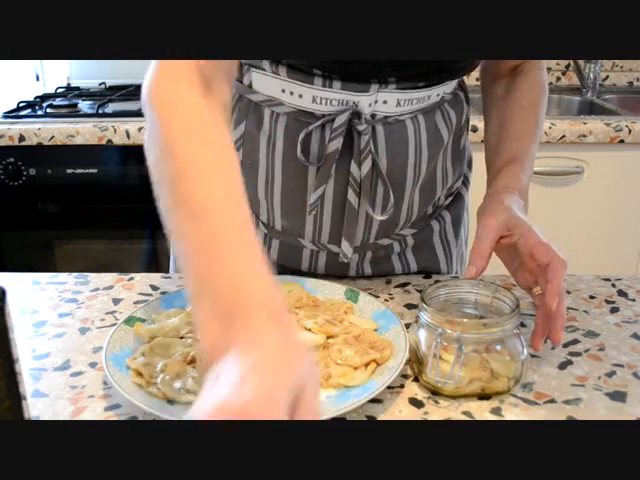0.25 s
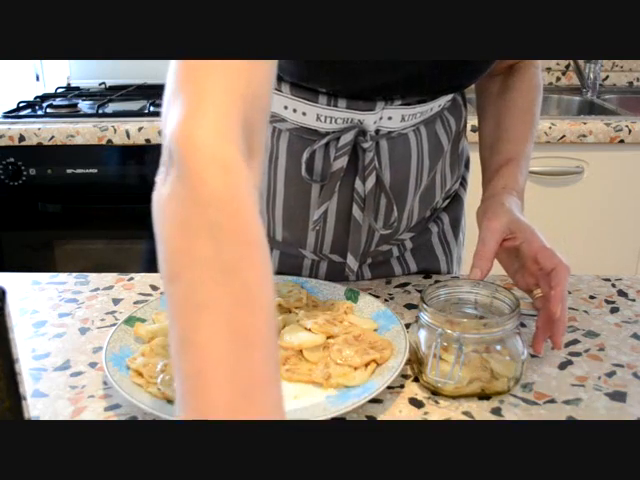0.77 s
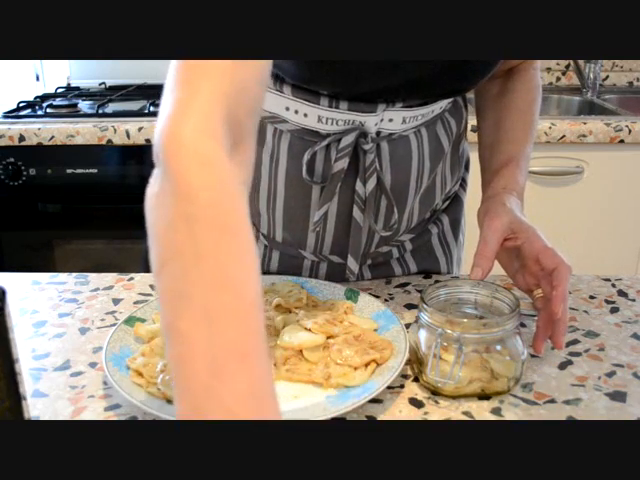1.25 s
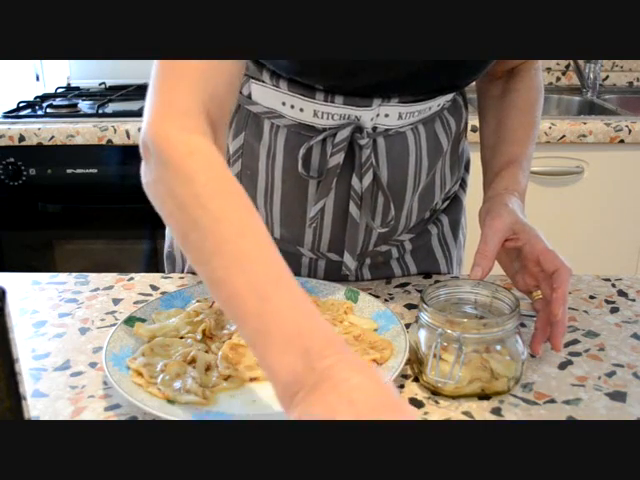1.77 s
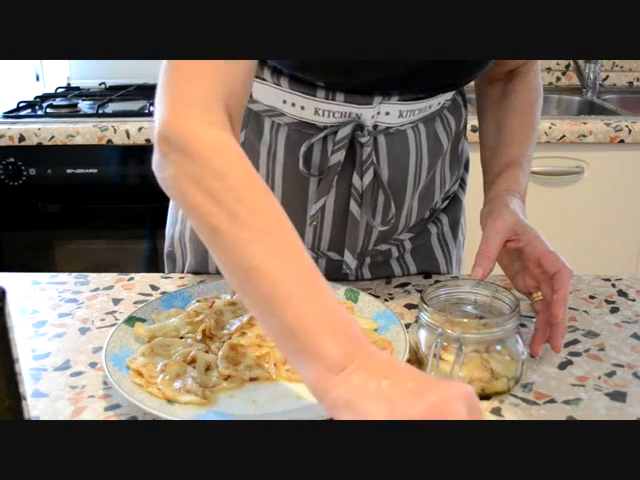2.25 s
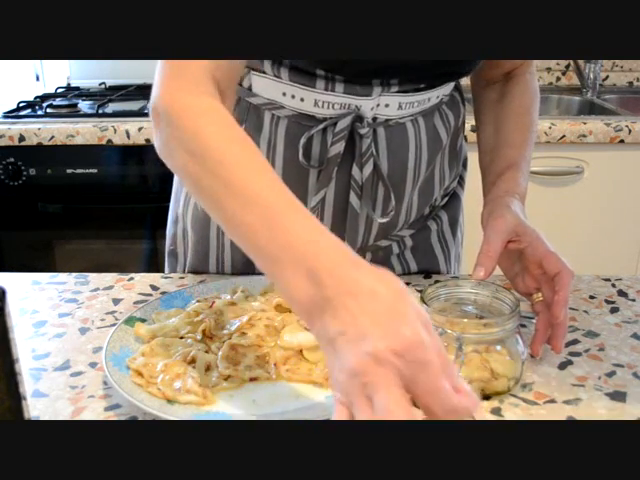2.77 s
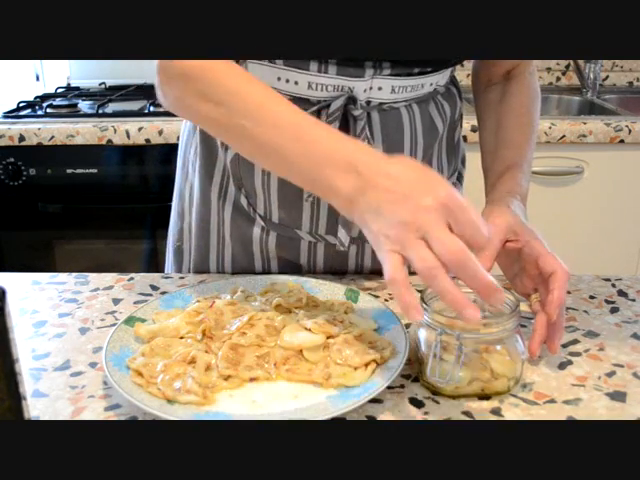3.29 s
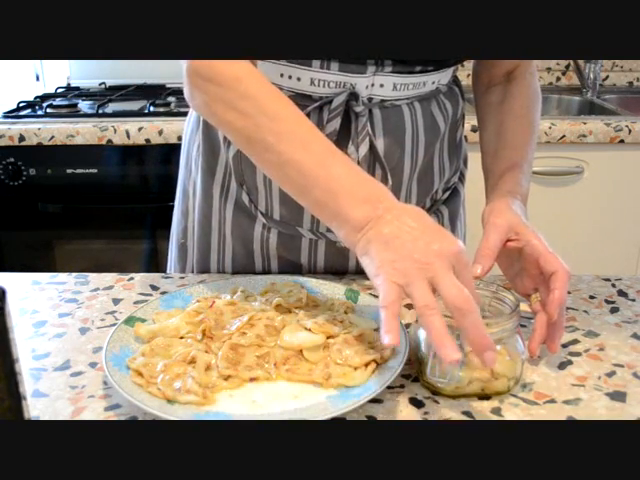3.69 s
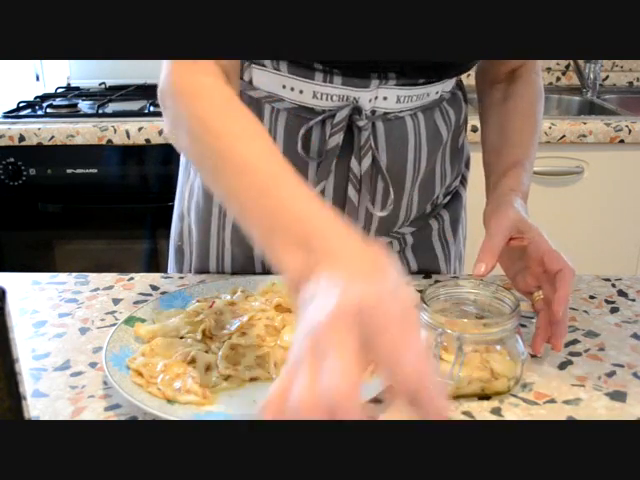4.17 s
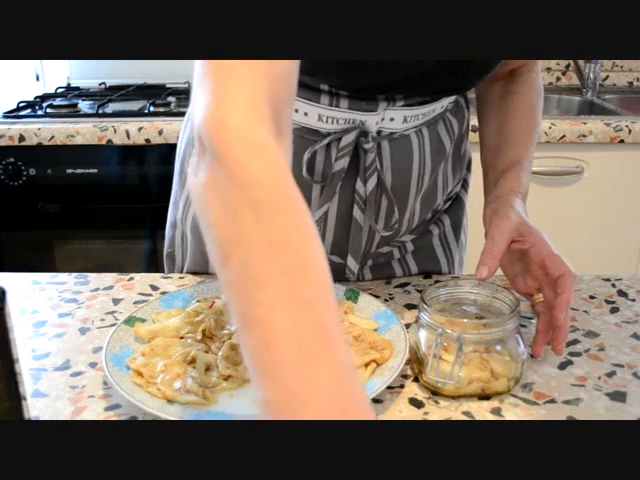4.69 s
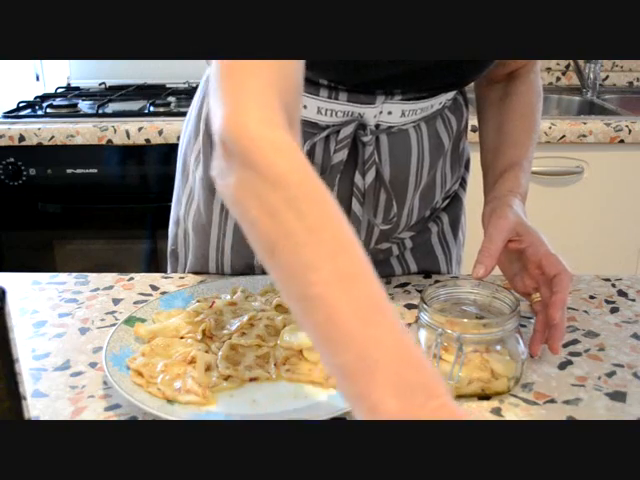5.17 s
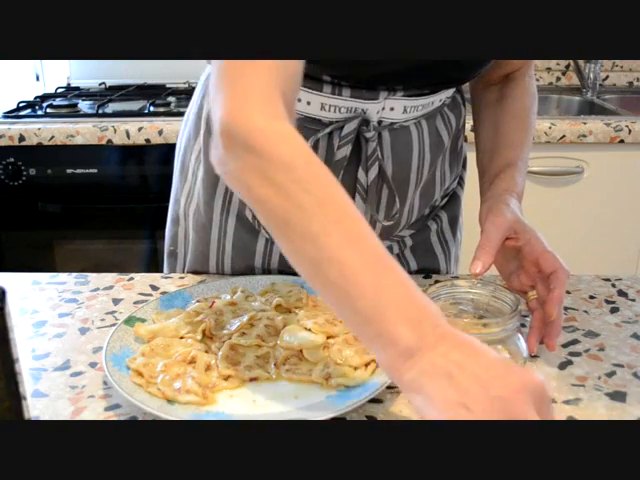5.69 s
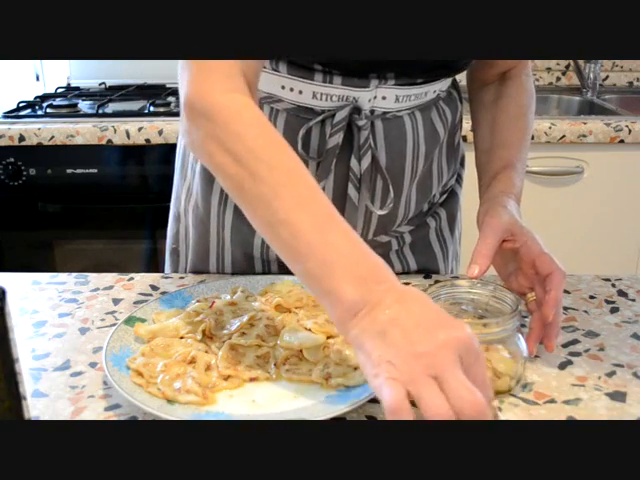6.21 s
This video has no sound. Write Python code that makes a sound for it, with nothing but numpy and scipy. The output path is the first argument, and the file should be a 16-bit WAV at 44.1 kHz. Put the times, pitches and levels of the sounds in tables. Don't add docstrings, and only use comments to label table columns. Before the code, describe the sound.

A fridge hums low and softly throughout, with a faint wavering whirr and room air. Around 0.3-0.7 s a sleeve rustles, barely audible. At 0.83 s a stoneware dish knocks the stone worktop, with a soft rocking at 0.95-1 s. From 1.4 to 1.9 s it drags over the stone in a rough, grainy grind, with hard, ringing jolts at 1.56 and 1.64 s. At 1.94 s comes the loudest event: a hard thud and bright, high clink, ringing about half a second in the hard-walled room. A small dull knock follows at 2.25 s. Faint ticks and fingertip brushes touch a glass jar at 2.7 and 3.65 s; it bumps the stone lightly at 3.99 s. More light taps come at 4.7 s, then a longer gritty drag from 4.9 to 6.15 s, swelling early and again near 5.9 s, before its echo fades.

```python
import sys
import numpy as np
from scipy import signal
from scipy.fft import rfft, irfft
from scipy.io import wavfile
from scipy.ndimage import uniform_filter1d

SR = 44100
rng = np.random.default_rng(int(sys.argv[2]) if len(sys.argv) > 2 else 0)


def volts_from_decibels(level):
    exponent = np.asarray(level, float) / 20
    return 10 ** exponent


def inscribe(sig):
    pcm = np.round(np.clip(np.atleast_2d(sig).T, -1, 1) * 32767)
    wavfile.write(sys.argv[1], SR, pcm.astype(np.int16))


N = 284004
TIME = np.arange(N) / SR
CLINK_S = 1.9364


def level(x, db):
    return x * volts_from_decibels(db) / np.sqrt(np.mean(x ** 2))


def colour(x, points):
    hz, db = np.transpose(points)
    axis = np.log(np.arange(len(x) // 2 + 1) * SR / len(x) + 1)
    gain = volts_from_decibels(np.interp(axis, np.log(hz), db))
    return irfft(rfft(x) * gain, len(x))


def band(x, hz, width_hz):
    b, a = signal.iirpeak(min(hz, .45 * SR), hz / width_hz, fs=SR)
    return signal.lfilter(b, a, x)


def walk(rate):
    hold = int(SR / rate)
    steps = np.repeat(rng.standard_normal(N // hold + 1), hold)
    slewed = uniform_filter1d(uniform_filter1d(steps, hold), hold)
    return 1.3 * slewed[:N]


def add(out, s, sound):
    i = int(s * SR)
    out[i:i + len(sound)] += sound[:N - i]


def ring(hz, db, t60):
    t = TIME[:int(t60 * SR)]
    contact = np.minimum(t / .0004, 1)
    return volts_from_decibels(db) * np.sin(2 * np.pi * hz * t) * 1000 ** (-t / t60) * contact


def drags():
    # start_s, force_db
    forces = [
        [(1.39, -41.5), (1.45, -34.5), (1.542, -36), (1.56, -28.5), (1.65, -30.5), (1.75, -35), (1.826, -36.5),
         (1.92, -38)],
        [(4.91, -39), (4.99, -35.5), (5.14, -29.5), (5.4, -30.5), (5.55, -30.5), (5.68, -34), (5.934, -29.5),
         (6.134, -36), (6.18, -56)],
    ]
    # pitch_hz, level_db (per Hz)
    grind_spectra = [
        [(88, -58), (150, -34.5), (328, -25.5), (378, -4), (532, -11), (605, -2.5), (839, -3.5), (941, -3),
         (1070, -5), (1220, -3), (4500, -29.5), (5850, -51), (9900, -120)],
        [(88, -66), (150, -36), (322, -27.5), (376, -12.5), (528, -10), (599, -5.5), (854, 5), (1130, 0),
         (1940, -8), (2110, -9.5), (4400, -28), (5720, -62), (9680, -120)],
    ]
    # pitch_hz, level_db (per Hz)
    grit_spectrum = [(1470, -18), (2500, 1.5), (4110, -9.5), (5500, -7.5), (6080, -14.5), (6560, -11.5),
                     (9570, -15.5), (11300, -36.5), (14700, -58), (22000, -120)]
    # pitch_hz, width_hz, gain_db
    patches = [(420, 150, -11), (636, 140, -9), (980, 158, -7.5), (1450, 450, -5), (1890, 92, -1)]
    # start_s, extra_grit_db
    jolts = [
        (1.38, 7.4),
        (1.562, 9.6),
        (4.89, 3.3),
        (5.86, 6.2),
    ]
    settle_s, patch_swing_db = 0.12, 6
    base_grit_db, sing_db = -15, -23

    grain_sizes = np.minimum(rng.exponential(size=N), 3)
    struck = rng.random(N) < .12
    clicks = rng.standard_normal(N) * volts_from_decibels(3.0 * grain_sizes) * struck
    uneven = volts_from_decibels(2.0 * walk(40))
    grit = level(colour(np.roll(clicks, N // 3), grit_spectrum), 0)
    sings = level(band(clicks, 5930, 50), 0)
    sings += level(band(clicks, 5750, 400), -8)
    sings += level(band(clicks, 7740, 35), -17)
    grit_db = np.full(N, float(base_grit_db))
    for s, db in jolts:
        grit_db += db * (TIME > s) * np.exp(-np.abs(TIME - s) / settle_s)

    out = np.zeros(N)
    for force, spectrum in zip(forces, grind_spectra):
        s, db = np.transpose(force)
        force_db = np.interp(TIME, s, db)
        grind = level(colour(clicks, spectrum), 0) * uneven
        grind += sum(volts_from_decibels(gain_db + patch_swing_db * walk(7)) * band(grind, hz, width_hz)
                     for hz, width_hz, gain_db in patches)
        touching = uniform_filter1d(1. * ((TIME > s[0]) & (TIME < s[-1])), size=2600)
        scrape = grind + volts_from_decibels(grit_db) * grit + volts_from_decibels(sing_db) * sings
        out += touching * volts_from_decibels(force_db - 8.0) * scrape
    return out


def dull_contacts():
    # start_s, peak_db, high_hz, length_s
    dish_knocks = [
        (0.825, -27, 2080, 0.016),
        (1.381, -35.5, 1600, 0.057),
        (1.937, -11, 2325, 0.049),
        (2.7, -52.5, 1420, 0.05),
        (4.752, -41, 1280, 0.037),
        (4.898, -39, 1210, 0.029),
        (2.245, -40.5, 3500, 0.02),
    ]
    # start_s, peak_db, low_hz, high_hz, length_s
    rocks = [
        (0.954, -42, 340, 1550, .1),
        (0.99, -44, 810, 885, 0.05),
    ]
    # low_hz, high_hz, peak_db
    slam = [
        (2000, 3560, -25.5),
        (110, 330, -48.5),
        (336, 619, -31),
        (3700, 7800, -29.5),
        (7800, 10600, -45),
    ]
    # low_hz, high_hz, peak_db
    jar = [
        (305, 670, -37.5),
        (700, 1420, -46.5),
        (1850, 2340, -45.5),
    ]
    return ([(s, db, 582, high_hz, length) for s, db, high_hz, length in dish_knocks] + rocks
            + [(CLINK_S, db, low_hz, high_hz, .04) for low_hz, high_hz, db in slam]
            + [(3.9915, db, low_hz, high_hz, .01) for low_hz, high_hz, db in jar])


def knocks():
    # pitch_hz, width_hz, gain_db
    slab_modes = [(846.6, 90, -5), (1548, 160, -5)]
    out, t = np.zeros(N), TIME[:SR // 4]
    for s, db, low_hz, high_hz, length in dull_contacts():
        push = (1 - np.exp(-t / .001)) * np.exp(-t / length)
        spectrum = rfft(rng.standard_normal(len(t)) * push)
        spectrum /= np.sqrt(uniform_filter1d(np.abs(spectrum) ** 2, size=40))
        shaken = signal.butter(4, [low_hz, high_hz], "band", fs=SR, output="sos")
        scuff = signal.sosfilt(shaken, irfft(spectrum)[:SR // 5])
        scuff += sum(volts_from_decibels(gain_db) * band(scuff, hz, width_hz) for hz, width_hz, gain_db in slab_modes)
        add(out, s, volts_from_decibels(db) * scuff / np.abs(scuff).max())
    return out


def resting_rings():
    # start_s, lower_mode_db, upper_mode_db
    blows = [
        (.825, -56, -72),
        (.865, -58, -65),
        (.99, -61.5, -64),
        (1.33, -59.5, -80.5),
        (1.5648, -21.5, -25),
        (1.6413, -47, -55.5),
        (1.666, -45.5, -46.5),
        (3.085, -89.5, -66),
    ]
    # pitch_hz, t60_s
    modes = [(5920, .085), (7555, .06)]
    out = np.zeros(N)
    for s, *mode_dbs in blows:
        for db, (hz, t60) in zip(mode_dbs, modes):
            add(out, s, ring(hz, db, t60))
    return out


def clink(brief):
    pitches = [5136, 5563, 5572, 5610, 5847, 6315, 7244, 7256, 7200, 9100, 11180, 11340]
    decays = [.2, 0.61, 0.544, .025, .36, .2, .42, 0.3, .03, .02, .04, .12]
    strengths = [-41.5, -25, -28, -11, -28, -55.5, -26.5, -22, -12, -42, -58.5, -61]
    out = np.zeros(N)
    for hz, db, t60 in zip(pitches, strengths, decays):
        if (t60 < .035) == brief:
            add(out, CLINK_S, ring(hz, db, t60))
    return out


def ticks():
    # start_s, peak_db, pitch_hz
    sharp = [
        (1.3304, -51, 5500),
        (1.5633, -27.5, 6120),
        (1.6433, -19.5, 4990),
        (1.9365, -8.5, 4200),
    ]
    # start_s, peak_db, pitch_hz
    pings = [
        (2.7096, -58, 7000),
        (3.645, -57, 5840),
        (3.992, -50, 5800),
        (4.6962, -52, 5130),
        (4.6965, -45, 2710),
    ]
    # start_s, peak_db
    grazes = [
        (1.6449, -34.5),
        (1.9368, -31),
        (2.71, -54.5),
        (3.105, -55.5),
        (3.6244, -52),
        (3.97, -54.5),
        (3.9936, -52.5),
        (4.6978, -64),
        (4.782, -62),
    ]
    contacts = [(s, db, hz, hz / 1.73) for s, db, hz in sharp]
    contacts += [(s, db, hz, 270) for s, db, hz in pings]
    contacts += [(s, db, 9400, 2800) for s, db in grazes]
    out, impulse = np.zeros(N), 1. * (np.arange(SR // 20) == 0)
    for s, db, hz, width_hz in contacts:
        click = band(band(impulse, hz, width_hz), hz, 2 * width_hz)
        add(out, s, volts_from_decibels(db) * click / np.abs(click).max())
    return out


def brushes():
    # start_s, length_s, level_db
    fingertips = [
        (2.75, .08, -77),
        (3.656, .1, -73),
        (4.447, 0.076, -79),
        (4.836, .15, -77),
    ]
    # start_s, length_s, level_db, pitch_hz
    sleeve = [
        (0.463, 0.42, -68.5, 1220),
        (0.488, 0.25, -74, 2170),
    ]
    out = np.zeros(N)
    for s, length, db, hz in sleeve + [(*row, 9350) for row in fingertips]:
        hiss = level(band(band(rng.standard_normal(N), hz, hz / 6), hz, hz / 4), db)
        out += hiss * np.exp(-((TIME - s) / length * 2) ** 2)
    return out


def thumps():
    # start_s, peak_db
    pushes = [
        (1.563, -57),
        (1.643, -60),
        (1.937, -58),
    ]
    length_s = .006
    out = np.zeros(N)
    for s, db in pushes:
        add(out, s, volts_from_decibels(db) * np.hanning(int(length_s * SR)))
    return out


def kitchen(x):
    # pitch_hz, t60_s
    decay = np.array([(150, 1), (380, 1), (900, 1.0), (1800, 0.73), (3500, 0.58), (6000, 0.53),
                      (11000, 0.53)])
    tail_db, rise_s = 2.5, 0.0065
    hz, t, cells = signal.stft(rng.standard_normal(int(1.3 * SR)), SR, nperseg=256)
    t60 = np.interp(np.log(hz + 1), np.log(decay[:, 0]), decay[:, 1])
    tail = signal.istft(cells * 1000 ** (-t / t60[:, None]), SR)[1]
    tail = tail * (1 - np.exp(-TIME[:len(tail)] / rise_s))
    tail = tail * volts_from_decibels(tail_db) / np.sqrt(np.sum(tail ** 2))
    return x + signal.fftconvolve(x, tail)[:N]


def fridge():
    # pitch_hz, level_db (per Hz)
    air = [(15, -55.5), (25, -36), (90, -27), (146, -14), (386, -14), (485, -10), (552, -11), (694, -11),
           (1700, -15), (2690, -17.5), (3220, -19), (5230, -24), (7880, -30.5), (9420, -31), (11300, -48),
           (14700, -90), (22000, -120)]
    # order (multiple of shaft pitch), level_db
    hum = [(2, -77), (4, -82), (6, -86), (7, -85), (8, -81), (9, -72), (10, -64), (11, -78), (16, -86),
           (19, -84)]
    # pitch_hz, width_hz, level_db
    whirr = [(1970, 160, -74), (2635, 130, -67.5), (2958, 270, -69.5), (5140, 250, -79)]
    shaft_hz, hum_trim_db, hum_waver_db = 48.8, 0.5, 0.9

    out = level(colour(rng.standard_normal(N), air), -62.5) * volts_from_decibels(0.62 * walk(1.3))
    turn = 2 * np.pi * np.cumsum(shaft_hz * (1 + 0.000716 * walk(0.98))) / SR
    for order, db in hum:
        swing = np.sqrt(2) * volts_from_decibels(db + hum_trim_db + hum_waver_db * walk(1.9))
        out += swing * np.sin(order * turn + 2 * np.pi * rng.random())
    out += level(band(rng.standard_normal(N), 62, 40), -87.0)
    for hz, width_hz, db in whirr:
        out += level(band(rng.standard_normal(N), hz, width_hz), db) * volts_from_decibels(1.5 * walk(5))
    return out


def scene():
    near = ticks() + brushes() + clink(True)
    tick_wet = 0.23
    worktop = drags() + knocks() + resting_rings() + clink(False)
    hand = kitchen(worktop + tick_wet * near) + (1 - tick_wet) * near
    hand = signal.sosfilt(signal.butter(2, 120, "high", fs=SR, output="sos"), hand)
    return (hand + thumps() + fridge())[None]


def band_limit(x):
    return signal.sosfilt(signal.butter(12, 11420, fs=SR, output="sos"), x)


def record(dry):
    dip_hz, dip_width_hz, dip_depth = 8060, 500, 0.45
    heard = dry - dip_depth * band(dry, dip_hz, dip_width_hz)
    heard = signal.sosfilt(signal.ellip(8, .3, 60, 11300, fs=SR, output="sos"), heard)
    return band_limit(heard)


dry = scene()
out = record(dry)
inscribe(out)
```